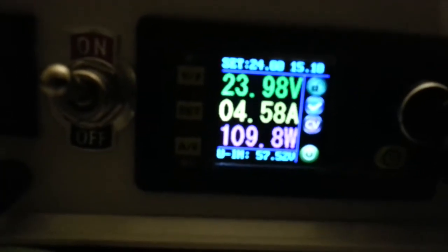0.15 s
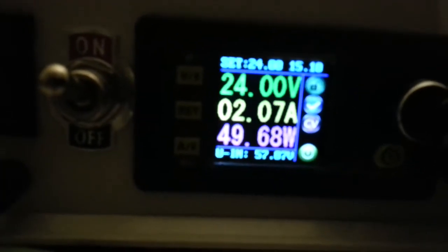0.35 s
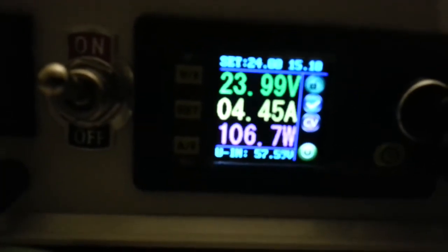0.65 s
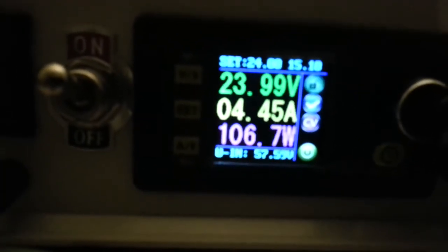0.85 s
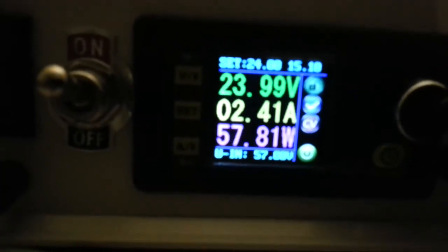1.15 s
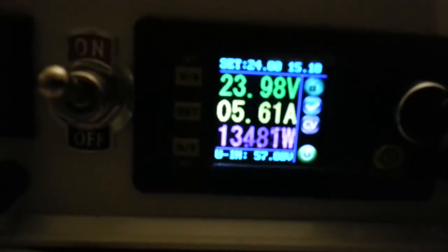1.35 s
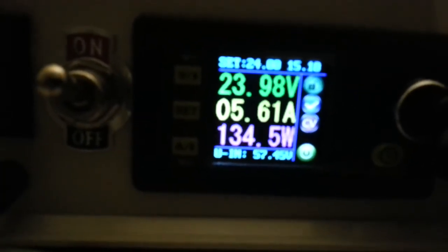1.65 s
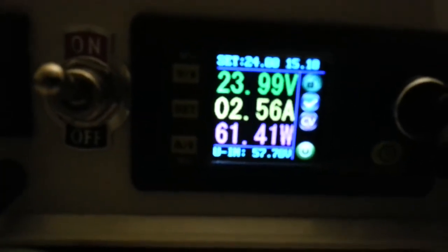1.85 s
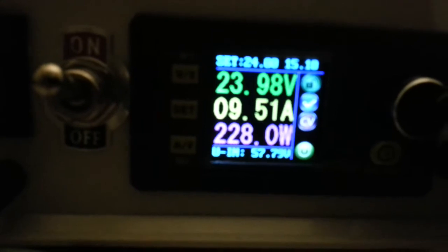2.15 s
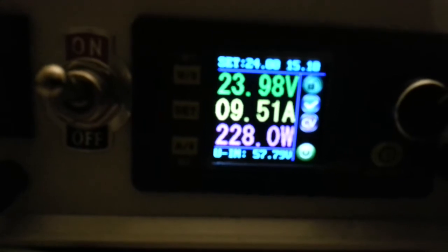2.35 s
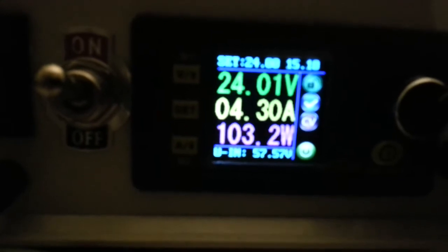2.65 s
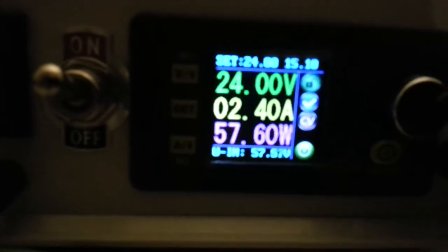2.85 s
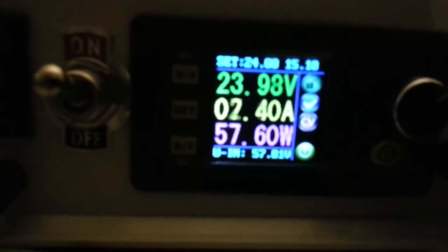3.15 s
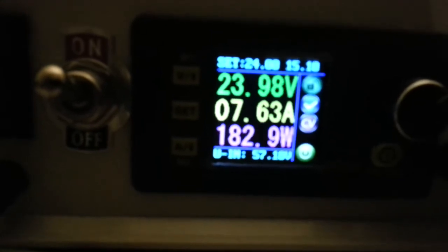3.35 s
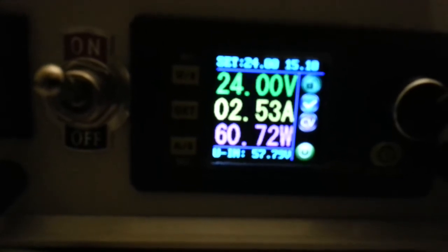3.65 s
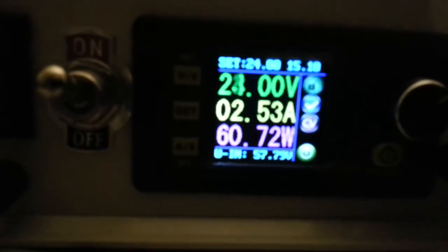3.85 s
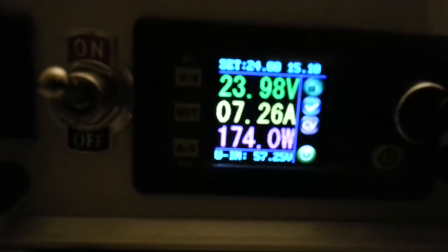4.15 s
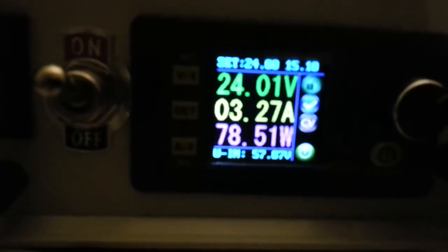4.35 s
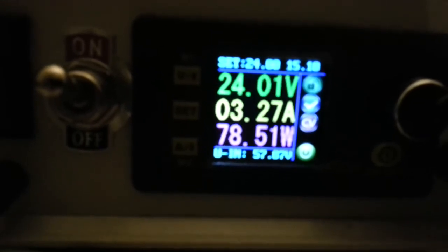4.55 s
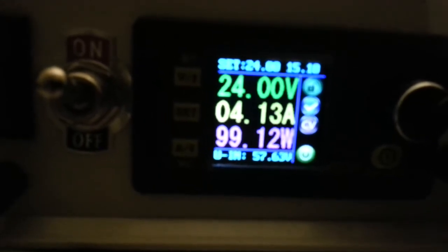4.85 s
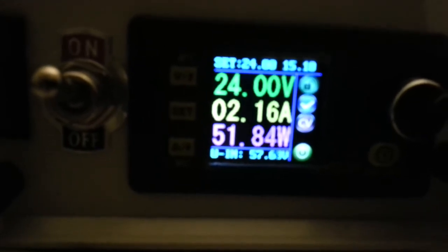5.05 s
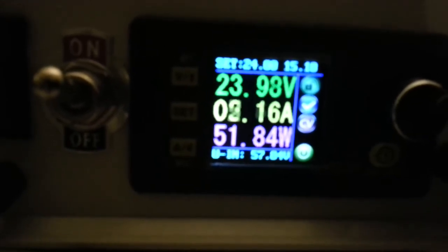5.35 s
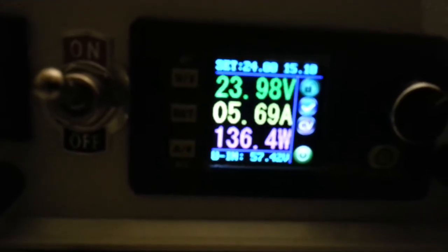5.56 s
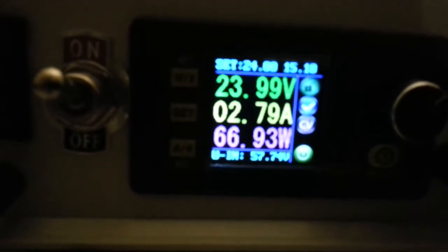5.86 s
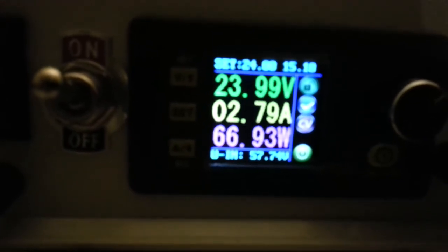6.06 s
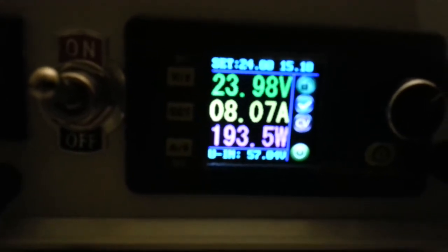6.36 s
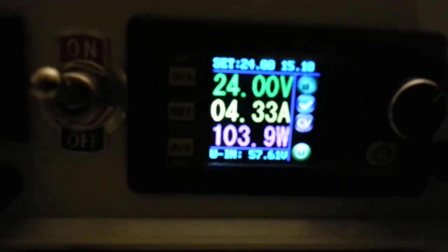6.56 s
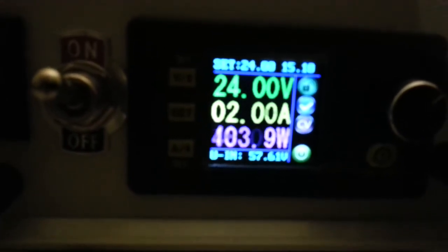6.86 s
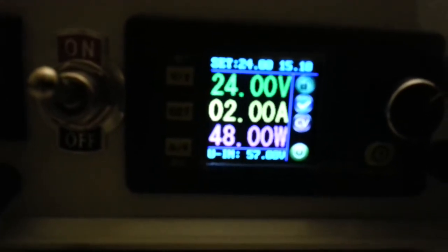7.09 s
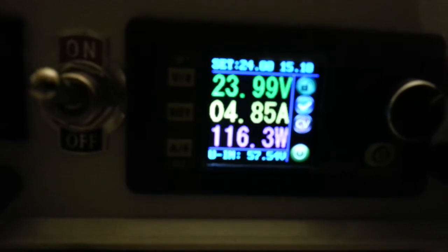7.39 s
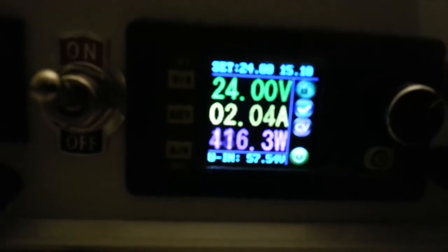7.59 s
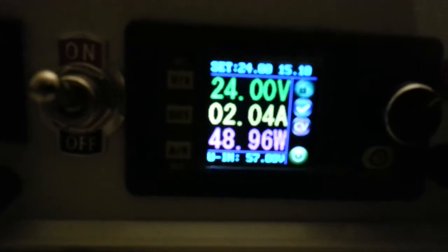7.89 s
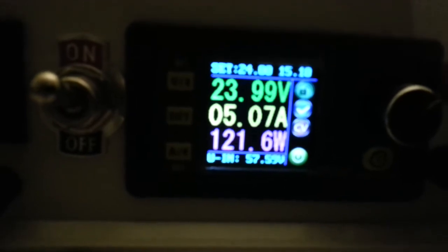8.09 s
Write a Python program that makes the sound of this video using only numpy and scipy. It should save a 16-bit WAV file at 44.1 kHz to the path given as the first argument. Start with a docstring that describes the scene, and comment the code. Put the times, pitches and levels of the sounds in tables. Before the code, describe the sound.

In a small room, a high-voltage arc snaps close by, to the right of a stereo microphone pair, while a cooling fan hums softly at a low pitch with airy noise. Hard, dry pops strike at about 0.1, 0.8, 1.5, 2.0, 2.5, 2.6, 3.4, 4.2, 4.9, 5.5, 6.1, 6.7, 7.5 and 8.1 seconds, with short room reflections. Tiny spits, a thin wavering whistle near 6 kHz and a brief sizzling flare lead into them. Bright, crackling hiss fills many gaps, strongest around 2.4 to 3.6 seconds, fainter and patchier later, with small soft puffs. The hiss nearly vanishes from 0.9 to 1.4 and from 6.8 to 7.3 seconds. A longer flare just after 4.0 ends almost without a pop, and the real snap follows immediately. At about 8.2 seconds comes a soft low rustle.

```python
"""A high-voltage arc on a workbench in a small room pops loudly fourteen times in about eight seconds.
A cooling fan hums throughout: a steady tone over soft noise. The arc smoulders with faint puffs and small spits,
then hisses while it burns (shaped noise); twice, about half a second each, its hiss all but vanishes.
Before a loud pop (one filtered pulse) it whistles near 6 kHz (a wavering tone) and flares into a sizzle (noise);
one flare, just after 4 s, ends almost without a pop. A soft low rustle comes at the very end.
The microphone pair stands close, with the arc to its right."""
import sys
import numpy as np
from scipy import signal
from scipy.fft import rfft, irfft
from scipy.io import wavfile
from scipy.ndimage import uniform_filter1d, map_coordinates

SR = 44100
rng = np.random.default_rng(int(sys.argv[2]) if len(sys.argv) > 2 else 0)


def unload_audio(sound):
    """Save the sound as a 16-bit wav file, at the path given as the first command line argument."""
    columns = np.transpose(np.atleast_2d(sound))
    # keep every value between -1 and 1, then stretch to whole-number steps
    steps = np.round(np.clip(columns, -1, 1) * 32767)
    wavfile.write(sys.argv[1], SR, steps.astype(np.int16))


N = 362797
TIME = np.arange(N) / SR

# All levels in the tables are at the source, before the source's own fine changes and the mix.
# A snap: the arc channel whistles and flares into a sizzle, and both end, nearly always with a loud pop;
# the flare before 4.129 s ends almost without one.
# (time of the end [s], pop level [dB], flare length [s], flare level [dB], treble lift [dB],
#  room share [dB], whistle length [s], whistle level [dB], whistle pitch [Hz])
SNAPS = [(0.1264, -13, 0.014, -21, 5, 8.5, 0.021, -12.5, 6240),
         (0.7969, -13.5, 0.0262, -12.5, -3, -0.5, 0.029, -6, 6385),
         (1.4953, -12.5, 0.0069, -12, 6.5, -8, .010, -21, 6800),
         (2.0152, -13, 0.018, -15, 8, -3.5, 0.03, -17.5, 5990),
         (2.5126, -19.5, 0.014, -7.5, -2, -3.5, 0.019, -16, 6270),
         (2.633, -13, 0.02, -13.5, 4.5, -2, 0.052, -27, 5840),
         (3.3705, -12.5, 0.072, -11.5, 1, -2.5, 0.1, -18, 6160),
         (4.129, -50, 0.1, -12.5, -4.5, -3, .102, -11.5, 6090),
         (4.183, -12, 0.026, -13.5, 1, -2.5, 0.043, -18.5, 5885),
         (4.8617, -13.5, .0075, -11.5, -3.5, -.5, 0.0097, -22, 6460),
         (5.499, -11.5, 0.018, -14, 4.5, -4, 0.0139, -32, 6130),
         (6.0724, -15, 0.02, -12.5, -0.5, -0.5, 0.02, -19, 6096),
         (6.7442, -11, 0.0095, -15.5, 3.5, 1, 0.012, -13, 6270),
         (7.4855, -15, .007, -20.5, 8, 2, 0.0078, -21, 6190),
         (8.0954, -14, 0.004, -15, 10, -6, .005, -34, 6200)]
# A spit: a brief restrike with a small pop; the channel then sings on faintly until the next snap.
# (time [s], sizzle level [dB], treble lift [dB], pop level [dB], singing level [dB])
SPITS = [(0.062, -32.5, -15, -41, -41), (.651, -16.5, -5, -19.5, -39), (.732, -14.5, -5, -48, -14),
         (0.742, -15.5, -2, -50, -12.5), (1.401, -28, -19, -52, -67), (1.420, -13.5, -21, -18.5, -57),
         (1.952, -18, -7, -22, -26), (3.133, -15, -2, -30, -38), (4.030, -10.5, -18, -21.5, -29),
         (4.152, -9, -10, -45, -26), (4.705, -28, -12, -45, -45), (4.724, -15.5, -27, -36, -40),
         (4.730, -20.5, -20, -20, -42), (4.786, -34, -21, -29, -41), (5.1, -27.5, -12, -41, -44),
         (5.423, -13, -4.5, -21, -44), (6.657, -18, -9, -22.5, -41), (6.674, -17.5, -20, -24, -42),
         (7.296, -19, -26, -27.5, -54)]
SPIT_S = 0.0024  # length of a spit's sizzle


def undb(db):
    """Decibels to gain."""
    return 10 ** (np.asarray(db) / 20)


def unit(x):
    """Scale to rms 1."""
    return x / np.sqrt(np.mean(x ** 2))


def walk(rate):
    """Smooth random motion with spread 1, drifting through about rate random values a second."""
    steps = rng.standard_normal(N // 8)
    return unit(map_coordinates(steps, [TIME * rate], order=2, mode="wrap"))


def colour(x, points, keep_power=True):
    """Filter to the spectrum given as (Hz, dB) points; it never answers before its input."""
    hz, db = np.transpose(points)
    size = 4096
    log_hz = np.log(np.fft.rfftfreq(size, 1 / SR) + 1)
    gain = undb(np.interp(log_hz, np.log(hz), db))
    cepstrum = irfft(np.log(unit(gain) if keep_power else gain))
    # folding the cepstrum forward in time makes the filter minimum-phase
    cepstrum[1:size // 2] *= 2
    cepstrum[size // 2 + 1:] = 0
    response = irfft(np.exp(rfft(cepstrum)))
    return signal.fftconvolve(x, response)[:len(x)]


def above(x, hz):
    """The part of a sound above a gentle crossover."""
    highpass = signal.butter(1, min(hz, .45 * SR), "high", fs=SR, output="sos")
    return signal.sosfilt(highpass, x)


def gate(start, length, edge):
    """Sample indices and the soft-edged envelope of one burst; all three settings in seconds."""
    first = max(int((start - .01) * SR), 0)
    last = min(int((start + length + .02) * SR), N)
    i = np.arange(first, last)
    rise = 1 + np.tanh((TIME[i] - start) / edge)
    fall = 1 - np.tanh((TIME[i] - start - length) / edge)
    return i, rise * fall / 4


def fan(hum_hz=188.6, hum_db=-60, air_db=-54, drift_hz=0.39, side_above_hz=700, right_db=2.5):
    """A blade tone of slightly drifting pitch over soft air noise, alike on both ports in the bass."""
    # air noise: (frequency [Hz], level [dB])
    air_spectrum = [(25, -13), (60, -21), (100, -11), (150, -4.5), (230, 2), (310, -3), (450, -2),
                    (700, -3.5), (1200, -10.5), (2500, -11), (5000, -15), (9000, -17), (14500, -17.5)]
    phase = 2 * np.pi * np.cumsum(hum_hz + drift_hz * walk(8)) / SR
    hum = undb(hum_db) * np.sqrt(2) * np.sin(phase)

    def air():
        return colour(rng.standard_normal(N), air_spectrum) * undb(air_db + 0.077 * walk(17))

    mid = air()
    side = above(air(), side_above_hz)
    left = (hum + mid + side) * undb(-right_db / 2)
    right = (hum + mid - side) * undb(right_db / 2)
    return np.array([left, right])


def bump(start=8.16, length=.07, db=-45, low_hz=170, high_hz=460):
    """A soft low rustle, as of a hand shifting: a burst of band-limited noise."""
    band = signal.butter(2, [low_hz, high_hz], "band", fs=SR, output="sos")
    rustle = unit(signal.sosfilt(band, rng.standard_normal(N)))
    i, shape = gate(start, length, edge=0.011)
    out = np.zeros(N)
    out[i] = undb(db) * shape * rustle[i]
    return out


def burning(swell_db=7.5, release_db_per_s=602, smoulder_db=-53.5, throb_hz=25.15, throb_drift_hz=4.84):
    """Level of the arc in dB: each stretch swells, holds and dies away over a faint smoulder; some throb."""
    # stretches of hissing: (start [s], length [s], level [dB], swell time [s], throb [dB])
    burns = [(0.376, 0.17, -34, 0.1, -1), (.56, 0.26, -38.5, 0.022, 1.5), (1.697, .3, -40.5, .25, 2),
             (2.19, 0.2, -40, 0.057, 0), (2.36, 0.25, -23, 0.15, 3), (2.671, 0.62, -27, .24, -0.6),
             (3.415, .215, -31, 0.046, 1), (3.706, 0.38, -41, .04, 0.5), (4.235, 0.374, -34.5, .06, 3.5),
             (4.628, 0.18, -45.5, 0.0052, 9.5), (5.078, 0.094, -42, 0.0042, 6),
             (5.237, 0.17, -45, 0.012, 1), (5.738, 0.13, -39.5, .01, 3.5), (5.972, 0.089, -36.5, 0.0097, 1),
             (6.488, .2, -45, .15, 3), (7.805, 0.22, -43, 0.14, 0.5)]
    # the arc is out: (from [s], to [s])
    dark = [(.87, 1.41), (6.82, 7.3)]
    level_db = np.full(N, float(smoulder_db))
    for start, end in dark:
        level_db[(TIME > start) & (TIME < end)] = -85
    throb = np.sin(2 * np.pi * np.cumsum(throb_hz + throb_drift_hz * walk(12)) / SR)
    for start, length, db, swell_s, throb_db in burns:
        age = TIME - start
        outside = np.maximum(-age, 0) + np.maximum(age - length, 0)  # seconds away from the stretch
        swell = swell_db * (np.clip(age / swell_s, 0, 1) - 1)
        burn_db = db + swell + throb_db * throb - release_db_per_s * outside
        level_db = np.maximum(level_db, burn_db)
    return level_db


def crackle(per_s=45, length=0.0034, spread_db=4.5):
    """Envelope of sparse short spurts (length in seconds) at random times and of random size."""
    chance, size = rng.random(N), rng.standard_normal(N)
    marks = (chance < per_s / SR) * undb(spread_db * np.clip(size, -2, 2))
    return signal.fftconvolve(marks, signal.windows.hann(int(length * SR) + 3), "same")


def hiss(flutter_db=0.5, grain_db=0.5, surge_db=2.5, shift_db=-0.54, split_hz=7000,
         brighten=0.11, dull_db=-29, spurt_db=-14, spurt_follow=0.53):
    """The wandering arc root hisses and crackles; it is brighter when it burns harder."""
    # (frequency [Hz], level [dB])
    hiss_spectrum = [(200, -87), (1400, -40), (2500, -23.5), (3550, -12.5), (4350, -5), (5000, -2.5),
                     (6200, -1), (7700, -3.5), (9000, -12), (11500, -15), (14500, -26.5)]
    level_db = burning()
    unrest = unit(undb(surge_db * walk(21.74) + flutter_db * walk(130) + grain_db * walk(900)))
    alight = 1 / (1 + undb(2 * (-43.0 - level_db)))  # a faint arc hardly crackles
    spurts = alight * undb(spurt_db + spurt_follow * level_db) * crackle()
    size = undb(level_db) * unrest + spurts
    noise = colour(rng.standard_normal(N) * size, hiss_spectrum)
    treble = above(noise, split_hz)
    # the tilt lifts the treble and lowers the rest, or the other way round
    tilt_db = shift_db * walk(21) + brighten * (level_db - dull_db)
    return treble * undb(tilt_db) + (noise - treble) * undb(-tilt_db)


def singing(peep_db=20.5, peep_top_db=-21, peep_s=0.0024, fade_db_per_s=54,
            rise_db=10.5, fall_db=6.5, crest=0.16):
    """Strength and pitch of the channel: a peep and fading tone after each spit, a swell into each snap."""
    end_s, *_, whistle_s, whistle_db, pitch_hz = np.transpose(SNAPS)
    coming = np.minimum(np.searchsorted(end_s, TIME), len(SNAPS) - 1)  # the snap that comes next
    size = np.zeros(N)
    for start, *_, db in SPITS:
        next_end = end_s[coming[int(start * SR)]]
        i, shape = gate(start, next_end - start, edge=.00045)
        age = np.abs(TIME[i] - start)
        # the peep is a short lift over the singing, up to a highest level
        peep = undb(min(db + peep_db, peep_top_db)) * np.exp(-age / peep_s)
        fading = undb(db - fade_db_per_s * age)
        size[i] = np.maximum(size[i], shape * (peep + fading))
    for end, length, db in zip(end_s, whistle_s, whistle_db):
        i, shape = gate(end - length, length, edge=0.00027)
        progress = 1 + (TIME[i] - end) / length  # the whistle is loudest where this equals crest
        arch_db = np.interp(progress, [0, crest, 1], [-rise_db, 0, -fall_db])
        size[i] = np.maximum(size[i], shape * undb(db + arch_db))
    return size, pitch_hz[coming]


def whistle(flutter_db=4.5, overtone_db=-27):
    """The channel oscillates as a tone with a faint overtone; its pitch and strength never hold still."""
    size, pitch_hz = singing()
    waver_hz = 115 * walk(700)
    phase = 2 * np.pi * np.cumsum(uniform_filter1d(pitch_hz, size=128) + waver_hz) / SR
    tone = np.sqrt(2) * (np.sin(phase) + undb(overtone_db) * np.sin(2 * phase))
    flutter = unit(undb(flutter_db * walk(420)))
    return size * flutter * tone


def flares(crackle_db=2.0, sputter_db=1.0, treble_hz=9000, body_hz=2800, early_body_db=-12, spit_room_db=-0.5):
    """Dense tiny restrikes sizzle as noise and gain body as they grow. Returns (direct, room feed)."""
    # (frequency [Hz], level [dB])
    flare_spectrum = [(60, -32), (300, -21), (700, -2), (1150, -3.5), (2000, -3.5), (2330, -0.5), (2900, 1),
                      (4500, 1), (7000, 5.5), (9500, 3.5), (12000, -1), (14500, -1)]
    unrest = undb(crackle_db * walk(1400) + sputter_db * walk(260))
    sizzle = colour(rng.standard_normal(N) * unrest, flare_spectrum)
    treble = above(sizzle, treble_hz)
    body = sizzle - above(sizzle, body_hz)
    # a snap's flare ends at its listed time; a spit's sizzle begins at its own
    bursts = [(s - length, length, db, treble_db, room_db)
              for s, _, length, db, treble_db, room_db, *_ in SNAPS]
    bursts += [(s, SPIT_S, db, treble_db, spit_room_db) for s, db, treble_db, *_ in SPITS]
    out = np.zeros((2, N))
    for start, length, db, treble_db, room_db in bursts:
        i, shape = gate(start, length, edge=0.0005)
        body_db = np.interp(TIME[i], [start, start + length], [early_body_db, 0])
        burst = sizzle[i] + (undb(treble_db) - 1) * treble[i] + (undb(body_db) - 1) * body[i]
        rms = np.sqrt(np.average(sizzle[i] ** 2, weights=shape ** 2))
        flare = shape * undb(db) * burst / rms
        out[:, i] += np.outer([1, undb(room_db)], flare)
    return out


def pops(size_db=21.5, sharp_db=-15, sharpen=0.45, crack_hz=1500):
    """A pop is one suction pulse, as of a collapsing hot channel; the stronger it is, the more it cracks."""
    # (frequency [Hz], level [dB])
    pop_spectrum = [(30, -24), (120, -15), (240, 1.5), (320, -5.5), (500, -0.5), (640, 6), (830, 2.5),
                    (1100, -6), (1700, 3.5), (2000, -3.5), (2330, -0.5), (3200, -1), (4500, 2),
                    (8000, -25.5), (14500, -30.5)]
    # soft puffs of the smouldering arc: (time [s], level [dB])
    puffs = [(1.118, -35), (1.755, -33.5), (2.304, -31), (3.212, -35), (4.284, -29), (4.490, -32.5),
             (6.625, -33.5), (7.341, -30), (7.388, -29.5)]
    pulse_list = [(s, db) for s, db, *_ in SNAPS]
    pulse_list += [(s + SPIT_S / 2, db) for s, _, _, db, _ in SPITS]
    thud, crack = np.zeros(N), np.zeros(N)
    for s, db in pulse_list + list(puffs):
        thud[int(s * SR)] = -undb(db + size_db)
        crack[int(s * SR)] = -undb(db + size_db + sharpen * (db - sharp_db))
    # below crack_hz the pulse has the size of the thud, above it the size of the crack
    lowpass = signal.butter(2, crack_hz, fs=SR, output="sos")
    pulses = crack + signal.sosfilt(lowpass, thud - crack)
    return colour(pulses, pop_spectrum)


def echoes(t60, treble_t60, delay, split_hz=5000):
    """Dense reflections that set in after a delay [s] and fade by 60 dB in t60 [s]; unit energy."""
    t = TIME[:SR // 2]
    noise = rng.standard_normal(len(t))
    treble = above(noise, split_hz)
    fade, treble_fade = np.exp(-np.log(1000) * t / t60), np.exp(-np.log(1000) * t / treble_t60)
    tail = (noise - treble) * fade + treble * treble_fade
    tail *= 1 - np.exp(-(t / delay) ** 2)
    return tail / np.sqrt(np.sum(tail ** 2))


def space(direct, feed, direct_db=-5, bench_db=-7, room_db=-5.5, room_right_db=2.0,
          clutter_hz=2600, wander=1.8, left_lag=16):
    """The arc reaches the right port first and louder; bench clutter and walls answer on both."""
    # lift of the direct sound at the right port: (frequency [Hz], lift [dB])
    right_lift = [(100, 1), (600, 3.5), (1300, -4), (2500, 3.5), (4500, 3.5), (6200, 4), (8500, 3),
                  (13000, 7.5)]
    left = np.pad(direct, (left_lag, 0))[:N]  # lag in samples
    right = colour(direct, right_lift, keep_power=False)
    out = undb(direct_db) * np.array([left, right])
    scattered = above(direct, clutter_hz)  # small things only reflect short waves
    place = wander * walk(7)  # as the arc moves, one pattern of reflections gives way to another
    for port, side_db in enumerate([0, room_right_db]):
        for share in (np.cos(place), np.sin(place)):
            bench_echo = echoes(t60=0.015, treble_t60=0.0045, delay=0.0003)
            wall_echo = echoes(t60=0.26, treble_t60=0.24, delay=0.00085)
            bench = signal.oaconvolve(share * scattered, bench_echo)[:N]
            walls = signal.oaconvolve(share * feed, wall_echo)[:N]
            out[port] += undb(side_db) * (undb(bench_db) * bench + undb(room_db) * walls)
    return out


def scene(whistle_db=-2, whistle_room_db=-3, whistle_beam_db=-13):
    """The arc in its room, over the fan; the whistle beams toward the right port."""
    burn, tone, snap = hiss(), whistle(), pops()
    sizzle, sizzle_feed = flares()
    direct = burn + undb(whistle_db) * tone + snap + sizzle
    feed = burn + undb(whistle_room_db) * tone + snap + sizzle_feed
    beam = np.outer([0, undb(whistle_beam_db)], tone)
    return fan() + bump() + space(direct, feed) + beam


def record(dry, top_hz=14550):
    """The recorder clips the tallest peaks and cuts the top."""
    lowpass = signal.ellip(10, .2, 80, top_hz, fs=SR, output="sos")
    return signal.sosfilt(lowpass, np.clip(dry, -1, 1))


dry = scene()
out = record(dry)
unload_audio(out)
```